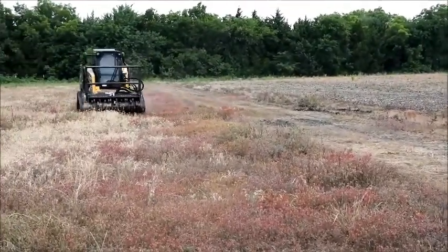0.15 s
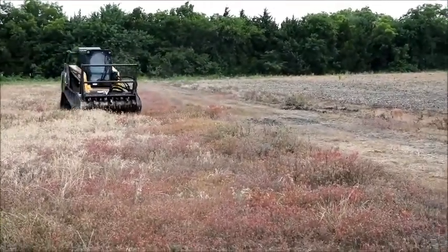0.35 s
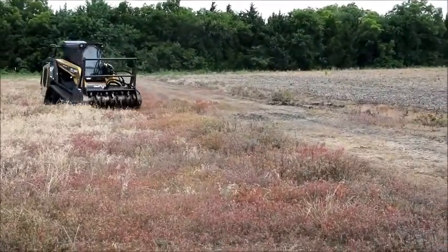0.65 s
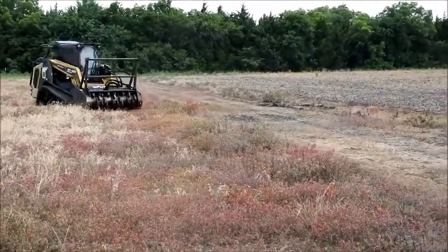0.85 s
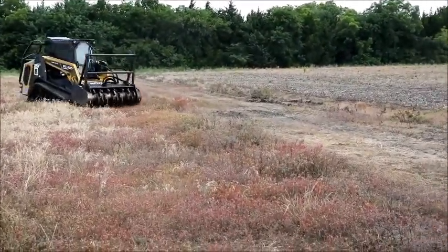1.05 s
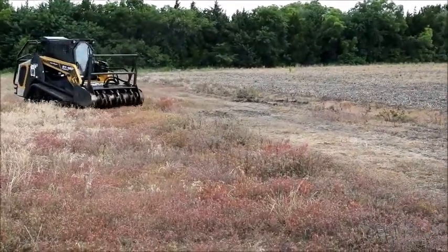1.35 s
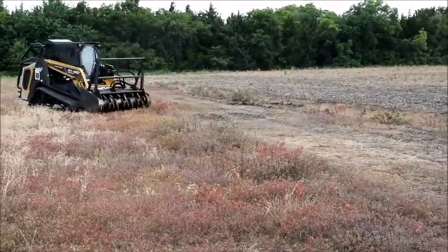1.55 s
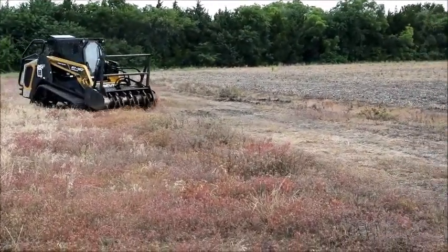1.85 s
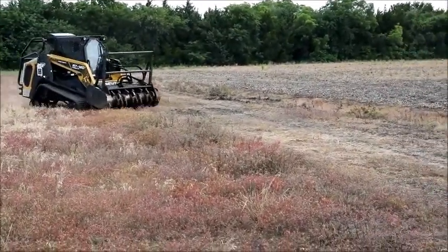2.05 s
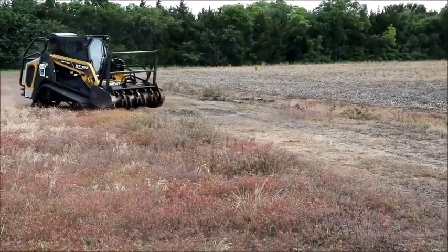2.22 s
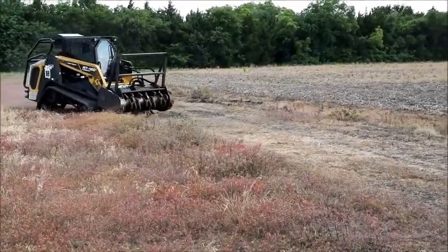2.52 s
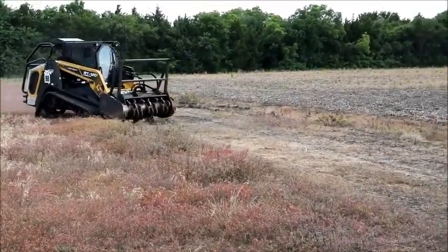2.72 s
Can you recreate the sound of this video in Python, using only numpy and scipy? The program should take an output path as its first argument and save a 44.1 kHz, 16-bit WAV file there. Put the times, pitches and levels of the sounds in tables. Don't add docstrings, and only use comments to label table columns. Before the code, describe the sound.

A tracked loader clatters across an open dry field, its rapid rattling clacks and uneven hollow thumps growing clearer, then doubled by the far track; steady engine hum, fan hiss, cracking stalks and shrill insect buzz surround it.

```python
import sys
import numpy as np
from scipy import signal
from scipy.fft import rfft, irfft, next_fast_len
from scipy.io import wavfile
from scipy.ndimage import uniform_filter1d, map_coordinates

SR = 44100
rng = np.random.default_rng(int(sys.argv[2]) if len(sys.argv) > 2 else 0)


def put_to_file(sound):
    columns = np.atleast_2d(sound).T
    safe = np.clip(columns, -1, 1)
    whole_steps = np.round(safe * 32767)
    wavfile.write(sys.argv[1], SR, whole_steps.astype(np.int16))


def to_linear_factor(level_db):
    exponent = np.asarray(level_db, float) / 20
    return 10 ** exponent


N = 127008

# (t/s, lugs passed)
TRAVEL = [(.008, 0), (.223, 5), (.353, 8), (.701, 16), (1.048, 24), (1.175, 27), (1.257, 29), (1.413, 33),
          (1.529, 36), (1.680, 40), (1.792, 43), (1.944, 47), (2.200, 54), (2.349, 58), (2.575, 64),
          (2.762, 69), (2.875, 72)]
STRAIGHT_S = 1.45
SCRAPE_S = .006


def unit(x):
    return x / np.sqrt(np.mean(x ** 2) + 1e-20)


def along(points, hz):
    f, v = np.transpose(points)
    return np.interp(np.log(hz + 1), np.log(f + 1), v, left=-120, right=-120)


def column(rows, s):
    t, *cols = np.transpose(rows)
    return [np.interp(s, t, c) for c in cols]


def wobble(rate):
    return map_coordinates(rng.standard_normal(400), [np.arange(N) * rate / SR])


def filtered(x, response):
    m = next_fast_len(len(x) + 8192)
    return irfft(rfft(x, m) * response(np.fft.rfftfreq(m, 1 / SR)), m)[:len(x)]


def peak(f, hz, width):
    return 1j * f * width / (hz * hz - f * f + 1j * f * width)


def noise(spectrum, size):
    return unit(filtered(rng.standard_normal(size), lambda f: to_linear_factor(along(spectrum, f))))


def add(out, s, piece):
    piece = piece[max(-round(s * SR), 0):]
    spot = out[max(round(s * SR), 0):][:len(piece)]
    spot += piece[:len(spot)]


def straight(s):
    return 1 / (1 + np.exp((STRAIGHT_S - s) / 0.14))


def tracks():
    # (t/s, clack level/dB, thump level/dB, brightness/dB)
    near = [
        (0, -24.5, -26.5, -7.5),
        (.25, -20, -27, -2),
        (.4, -15.5, -23.5, 0.5),
        (.8, -13.5, -28, 4),
        (1.2, -11.5, -21, 5.5),
        (1.45, -11, -26, 3),
        (1.7, -14, -26, -1),
        (2.2, -12, -22, 0.5),
        (2.6, -10.5, -22.5, 0.5),
        (2.88, -11.5, -24, 2),
    ]
    # (t/s, clack level/dB, lag/lugs)
    far = [
        (0, -68, 0.43),
        (1.3, -24, 0.77),
        (1.55, -20.5, 0.6),
        (2.0, -19.5, .66),
        (2.4, -18.5, .66),
        (2.88, -16, 0.78),
    ]
    odd_lugs = {8: 0.95, 10: -2, 15: -1.3, 21: -3, 24: 0.34, 30: -5, 32: -3.2, 34: -5, 35: -4.5, 36: 0.33,
                37: -7, 38: -2.9, 39: -1.9, 44: 0.21, 45: -1.6, 48: -1.4, 51: -1.5, 53: -2.5, 57: -2, 60:
                -4.5, 61: -3.3, 63: -5.5, 65: -3, 69: -5.5}
    odd_thumps = {1: 4.9, 2: 0, 3: 10.6, 6: 3.4, 8: -6, 10: 3.5, 13: -5, 15: -19, 18: 3, 23: -19, 26: -18,
                  30: -8, 32: -23, 33: -15, 35: -22, 36: 2.3, 37: 6.9, 38: 3.5, 43: -23, 44: -17, 45: 7.8,
                  49: -5, 53: 1.6, 54: -8, 55: -22, 56: 1.8, 58: .6, 60: 0, 62: 3, 66: 2.6, 70: -28, 71: -3,
                  72: -16}
    odd_bright = {16: 1.9, 24: -5, 25: 3.6, 28: 1.8, 32: 2.5, 35: 1.5, 36: -6.5, 41: 2.1, 42: 1, 44: 2.2,
                  46: -2.3, 50: -3.2, 53: -10, 55: 1.8, 59: 1.9, 61: 1.3, 62: -3.5, 68: -2.2}
    out = np.zeros(N)
    s, lugs = np.transpose(TRAVEL)
    for k in range(73):
        at = np.interp(k, lugs, s) + .0004 * rng.standard_normal()
        clack_db, thump_db, bright_db = column(near, at)
        bright_db = bright_db + odd_bright.get(k, 0)
        loose = 1 + .3 * (at > STRAIGHT_S)
        clack_db = clack_db - 13.5 + odd_lugs.get(k, 0) + .6 * rng.standard_normal()
        near_clack = to_linear_factor(clack_db) * clack(bright_db, loose, straight(at))
        add(out, at - .0006 - 2 * SCRAPE_S, near_clack)

        thump_db = thump_db - 3.0 + .8 * odd_thumps.get(k, 0)
        add(out, at, to_linear_factor(thump_db) * thump(at))

        far_db, lag = column(far, at)
        late = np.interp(k + lag + 0.08 * rng.standard_normal(), lugs, s)
        far_db = far_db - 16.0 + 0.87 * rng.standard_normal()
        add(out, late - 2 * SCRAPE_S, to_linear_factor(far_db) * clack(3, 3, 0.85))
    return out


def clack(bright_db, loose, mix):
    # (f/Hz, width/Hz, level while turning/dB, level when straight/dB)
    frame = [(1050, 140, -4.5, -9), (1336, 120, -1.5, -8), (1636, 250, -2.5, -7), (1804, 203, 1.5, -2.5),
             (2047, 132, 4.5, 3.5), (2180, 120, 1.5, -25), (2392, 135, -1.5, -2), (2620, 340, -9, -3.5),
             (2913, 123, -3.5, -1.5), (3600, 210, -10.5, -4.5), (4130, 2040, -14.5, -13.5),
             (7010, 1090, -13, -14), (12520, 540, -25, -19)]
    # (f/Hz, level per Hz/dB)
    rattle_shape = [(500, -2), (1000, -7), (2500, 1), (4000, -11), (7000, -18.5), (9000, -12),
                    (12500, -17.5), (15900, -27)]
    t = np.arange(3000) / SR - 2 * SCRAPE_S
    hold = 0.0061 * (1 - 0.25 * mix) * np.exp(.18 * rng.standard_normal())
    rise = .0008 * loose * np.exp(0.12 * rng.standard_normal())
    since = np.maximum(t, 0)
    after = np.maximum(t - rise - hold, 0)
    fall = np.exp(-after / 0.0067) + to_linear_factor(-16) * np.exp(-since / 0.019)
    blow = (1 - np.exp(-(since / rise) ** 2)) * fall
    scrape = to_linear_factor(-21) * np.exp(-(t / SCRAPE_S) ** 2)
    grit = map_coordinates(rng.standard_normal(80), [(t - t[0]) * 700])
    push = (blow + scrape) * to_linear_factor(2.5 * grit)

    levels = rng.normal(0, 1.77, len(frame))
    detune = rng.normal(1, 0.01, len(frame))

    def body(f):
        total = 0
        for k, (hz, width, turning_db, straight_db) in enumerate(frame):
            db = turning_db + (straight_db - turning_db) * mix + levels[k] + bright_db * (hz > 3300)
            total = total + (-1) ** k * to_linear_factor(db) * peak(f, hz * detune[k], width)
        return total

    ring = unit(filtered(push * rng.standard_normal(len(t)), body))
    rattle = unit(push * noise(rattle_shape, len(t)))
    both = ring + to_linear_factor(-4.5 + bright_db + rng.standard_normal()) * rattle
    return unit(filtered(both, lambda f: (1j * f / (970 + 1j * f)) ** 2))


def thump(s):
    # (f while turning/Hz, f when straight/Hz, time to fall 60 dB/s, level/dB)
    belt = [(156, 202, 0.45, -36), (183.3, 223.5, 0.093, -1), (237.7, 248, 0.12, -4.5),
            (299.5, 255.6, 0.089, 2), (304, 290, 0.059, 5.5)]
    t, mix = np.arange(4000) / SR, straight(s)
    damp = 1 - (1 - 0.72) * mix
    ring = np.zeros(len(t))
    for turning_hz, straight_hz, t60, db in belt:
        level, tune, phase = rng.standard_normal(3)
        hz = (turning_hz + (straight_hz - turning_hz) * mix) * (1 + 0.0022 * tune)
        fade = to_linear_factor(db + 1.6 * level - 60 * t / (t60 * damp))
        ring += fade * np.sin(2 * np.pi * hz * t + 0.83 * phase)
    ring = ring * (1 - np.exp(-(t / .005) ** 2))
    return ring / np.std(ring[:1100])


def debris():
    out, t = np.zeros(N), np.arange(200) / SR
    for place, pitch, size in zip(*rng.random((3, 260))):
        s = place * N / SR
        hz = 5130 * 2 ** (3.25 * (pitch - .5))
        size_db = -29 - 4.5 * np.log(size + 0.0012)
        size_db = size_db + 15.5 * (straight(s) - 1)
        crack = np.exp(-t * hz / 3) * np.sin(2 * np.pi * hz * t)
        add(out, s, to_linear_factor(size_db) * crack)
    return out


def belt_hum():
    # (multiple of lug rate, level/dB, unsteadiness/dB)
    hum_lines = [(6, -44, 4), (9, -40, 4), (10, -42, 4), (13, -43, 4)]
    s, lugs = np.transpose(TRAVEL)
    middles = (s[1:] + s[:-1]) / 2
    rate = np.interp(np.arange(N) / SR, middles, np.diff(lugs) / np.diff(s))
    passed = np.cumsum(uniform_filter1d(rate, size=8000)) / SR
    out = np.zeros(N)
    for k, db, sway in hum_lines:
        level = np.sqrt(2) * to_linear_factor(db + sway * wobble(6.87))
        out += level * np.sin(2 * np.pi * k * passed + 1.56 * wobble(8.5))
    return out


def engine():
    # (t/s, level/dB)
    closeness = [
        (0, -2),
        (.8, -2),
        (1.3, 0),
        (2.2, 1),
        (2.88, .5),
    ]
    # (multiple of shaft rate, level/dB, unsteadiness/dB, growth with closeness)
    order_lines = [(2, -38.5, .4, 1), (6, -47, 2, 1), (9, -34.5, .7, 1.5), (12, -52.5, 1.5, 3),
                   (15, -50.5, 1.5, 3), (15.6, -53, 2, 3), (18, -51, 1.2, 3), (27, -49.5, 1.2, 1)]
    # (f/Hz, level per Hz/dB)
    drone_shape = [(25, -34), (60, -19), (110, -14), (200, -5.5), (340, 0), (400, -19), (520, -40),
                   (600, -64)]
    whirr_shape = [(330, -49), (420, 1), (550, -3.5), (800, -6), (1050, 1), (1200, -6), (1400, -5),
                   (1600, -102)]
    hiss_shape = [(530, -20), (900, -4), (1460, 1.5), (2060, -1.5), (3280, -7.5), (6830, -17),
                  (11200, -14.5), (13000, -35), (15800, -30)]
    near_db, = column(closeness, np.arange(N) / SR)
    shaft_hz = 38.8 * (1 + 0.0032 * wobble(2.5))
    turn = 2 * np.pi * np.cumsum(shaft_hz) / SR
    lines = np.zeros(N)
    for k, db, sway, grows in order_lines:
        level = np.sqrt(2) * to_linear_factor(db + grows * near_db + sway * wobble(6.47))
        lines += level * np.sin(k * turn + rng.uniform(0, 4.31))
    drone = to_linear_factor(-32 + near_db + 2.0 * wobble(5.35)) * noise(drone_shape, N)
    whirr = to_linear_factor(-38 + 1.9 * near_db + 0.67 * wobble(6.9)) * noise(whirr_shape, N)
    hiss = to_linear_factor(-37.5 + 0.47 * near_db + 1.5 * wobble(21.5)) * noise(hiss_shape, N)
    return lines + drone + whirr + hiss


def field(x):
    t = np.arange(SR // 5) / SR
    tail = rng.standard_normal(len(t)) * to_linear_factor(-60 * t / 0.047) * (t > .004)
    return x + to_linear_factor(-17.5) * signal.fftconvolve(x, tail / np.linalg.norm(tail))[:N]


def ground(x):
    # (f/Hz, width/Hz, depth/0-1)
    dips = [(1462, 82, 0.61), (3340, 460, 0.36)]
    return filtered(x, lambda f: np.prod([1 - np.clip(deep, 0, .9) * peak(f, hz, width)
                                          for hz, width, deep in dips], axis=0))


def buzz(hz, width, size):
    return unit(filtered(rng.standard_normal(size), lambda f: peak(f, hz, width) ** 2))


def insects():
    chorus_hz = [13500, 13860, 14380, 14680, 14100]
    # (width/Hz, level/dB)
    chorus_bands = [(130, -39.5), (120, -41), (200, -45), (260, -45), (1500, -43)]
    # (t/s, level/dB)
    swell = [
        (0, -6),
        (.5, -5),
        (.85, -9),
        (1.2, -4),
        (1.5, -3),
        (1.9, -2.5),
        (2.3, 0.5),
        (2.88, -1),
    ]
    # (t/s, f/Hz, length/s, level/dB)
    chirps = [(.195, 13500, .07, -36), (.2, 13900, .06, -36), (.2, 14400, .05, -41), (.77, 13860, .07, -32),
              (.75, 13480, .06, -35), (.77, 14380, .05, -39), (.85, 14450, .045, -35),
              (.9, 13850, .06, -35), (1.39, 13500, .06, -34), (1.58, 13750, .05, -33),
              (1.86, 14600, .04, -37), (2.19, 13580, .065, -32), (2.22, 14480, .06, -37),
              (2.37, 13500, .06, -33), (2.45, 14800, .05, -37), (2.53, 13850, .05, -36),
              (2.6, 14400, .04, -36), (2.62, 13850, .1, -35), (2.67, 13500, .07, -33),
              (2.82, 14000, .06, -33)]
    swell_db, = column(swell, np.arange(N) / SR)
    out = np.zeros(N)
    for hz, (width, db) in zip(chorus_hz, chorus_bands):
        out += to_linear_factor(swell_db + db + 3 * wobble(29.2)) * buzz(hz, width, N)
    t = np.arange(4410) / SR
    for s, hz, long_s, db in chirps:
        arch = np.sin(np.pi * np.minimum(t / long_s, 1))
        shape = np.sqrt(np.clip(arch, 0, 1))
        add(out, s, to_linear_factor(db) * shape * buzz(hz, 90, len(t)))
    return out


def scene():
    contact = field(tracks() + debris())
    machine = ground(contact + belt_hum() + engine())
    return (machine + insects())[None]


def low_pass(x):
    return signal.sosfilt(signal.butter(12, 15860, fs=SR, output="sos"), x)


def record(dry):
    top_hz, cut_hz = 15120, 15840
    top = filtered(dry[0], lambda f: (f > top_hz) * (f < cut_hz))
    level = uniform_filter1d(top ** 2, size=round(.022 * SR))
    level = level / uniform_filter1d(level, size=SR)
    gate = uniform_filter1d(1. * (level > np.quantile(level, .87)), size=400)
    low = filtered(dry[0], lambda f: f <= top_hz)
    kept = low + to_linear_factor(-8) * filtered(gate * top, lambda f: f > top_hz)
    return low_pass(kept[None])


dry = scene()
out = record(dry)
put_to_file(out)
```